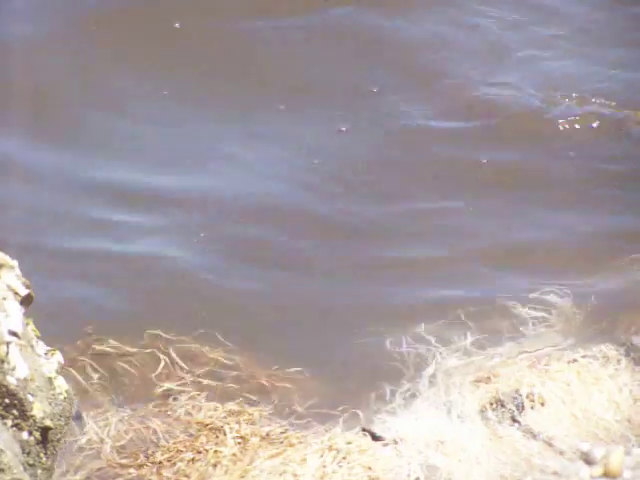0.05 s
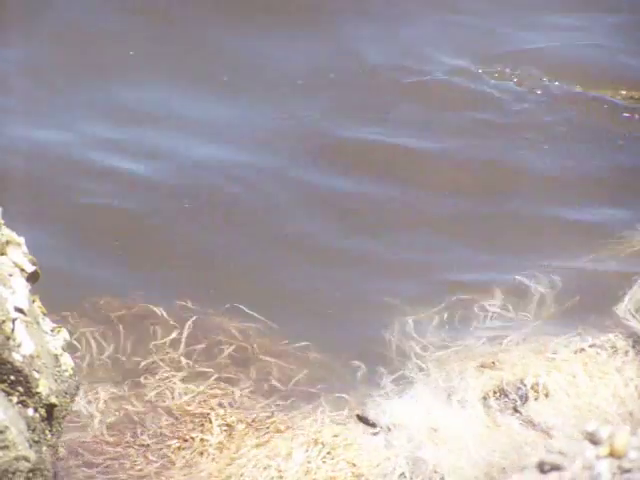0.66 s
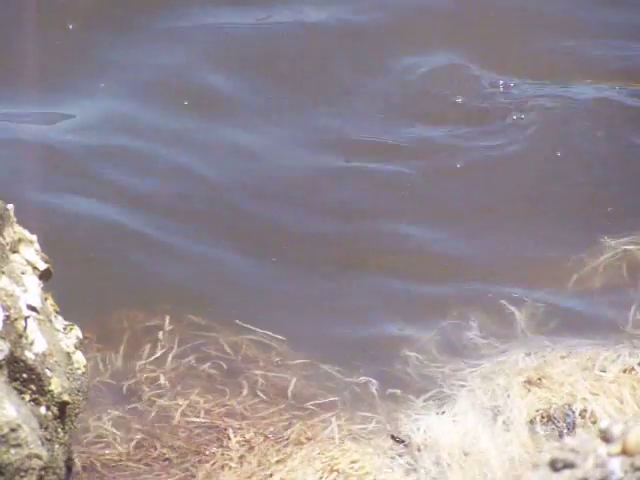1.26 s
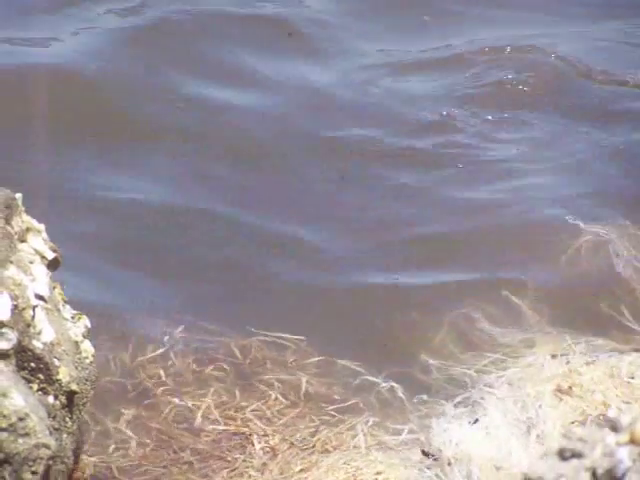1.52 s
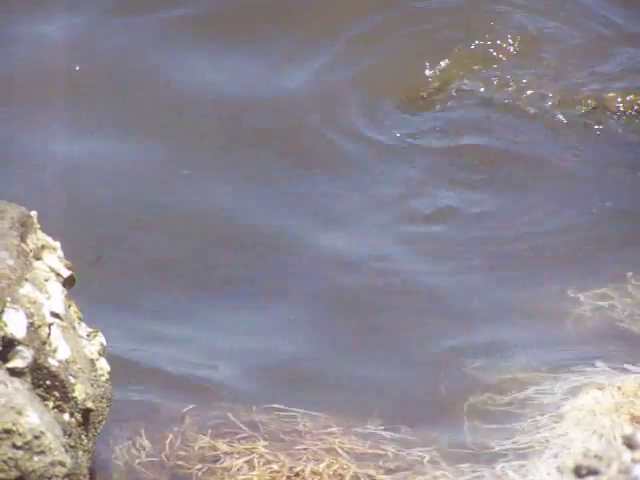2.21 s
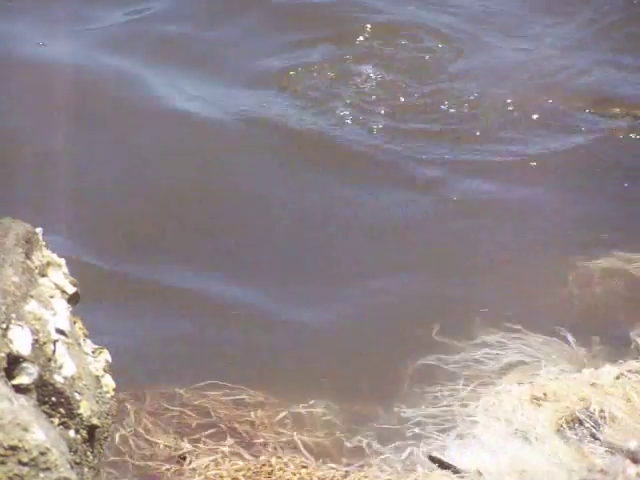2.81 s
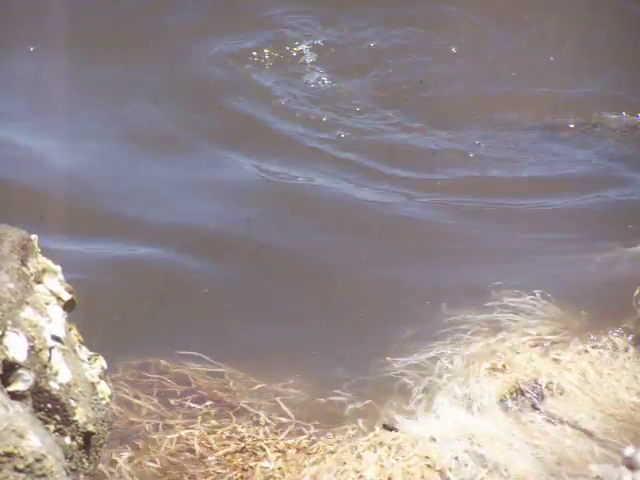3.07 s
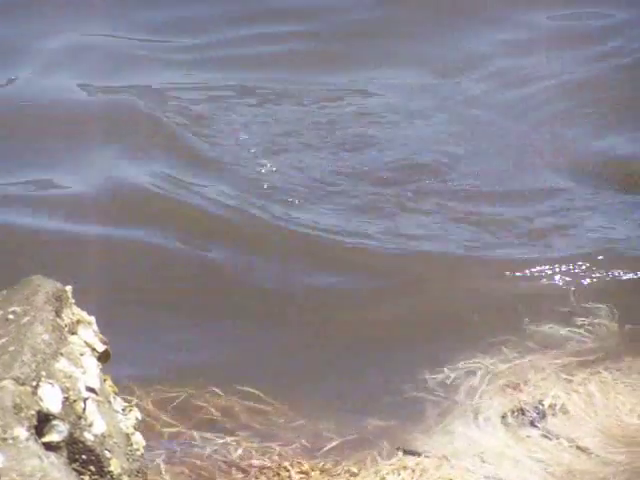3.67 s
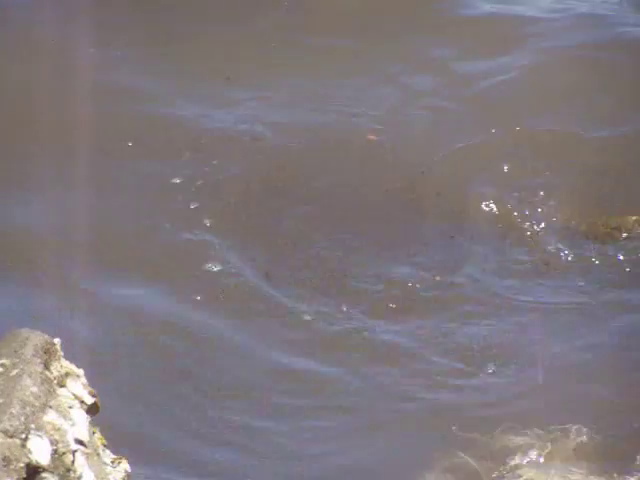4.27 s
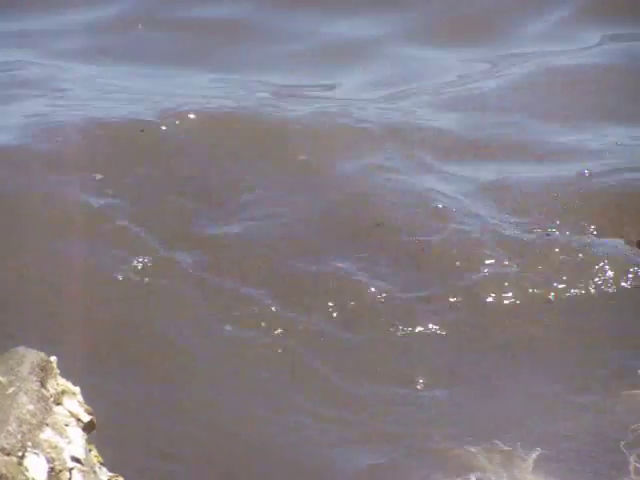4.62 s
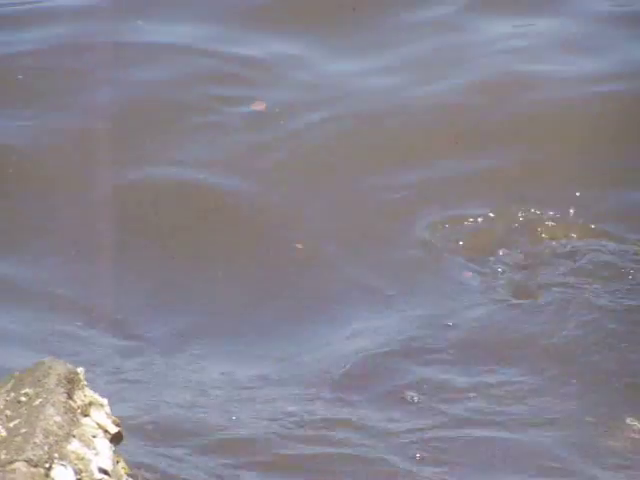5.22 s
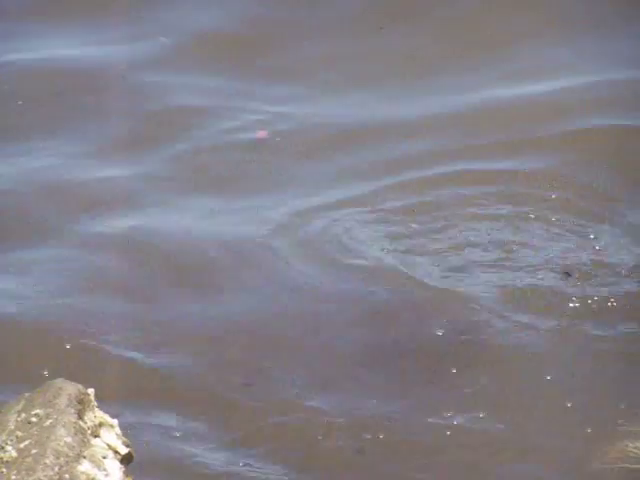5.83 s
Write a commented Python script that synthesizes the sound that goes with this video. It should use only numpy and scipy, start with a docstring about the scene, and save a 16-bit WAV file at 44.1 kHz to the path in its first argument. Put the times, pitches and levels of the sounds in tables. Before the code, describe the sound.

The sound fades in at about 0.3 seconds, close to the water on a rocky, weedy shore. Foam fizzes continuously as countless tiny bubbles burst, with soft gurgling water beneath. A few sharp little pops stand out between 0.7 and 1.3 seconds. Around 1.8 seconds small waves wash in and the hiss swells to its strongest just after 2 seconds, with light slaps, plops and fine spray. It eases, lifts slightly near 2.8 seconds, and a wavelet gives a brief slap at 3 seconds. Gentler fizzing follows, dotted with bubble pops and droplets ticking on rock. From about 5.3 seconds the foam swells again with a low slosh and more plops, lasting until the end near 6 seconds. A steady low rumble and a faint machine hum lie underneath throughout, and the highest treble is softened.

```python
"""Small waves on a rocky shore

Waves lap through weed and leave foam that fizzes as tiny bubbles burst. Larger bubbles plop and
gurgle, wavelets slap between the rocks, and a few drops tick close by. A low rumble with a faint
machine hum lies under it. The microphone fades in at the start and misses the highest treble."""
import sys
import numpy as np
from scipy import signal
from scipy.fft import rfft, irfft
from scipy.io import wavfile

SR = 44100
rng = np.random.default_rng(int(sys.argv[2]) if len(sys.argv) > 2 else 0)


def pcm_store(signal):
    """Save signal as 16-bit PCM."""
    levels = np.round(np.clip(np.atleast_2d(signal), -1, 1) * 32767)
    wavfile.write(sys.argv[1], SR, levels.astype(np.int16).T)


N = 257544
TIME = np.arange(N) / SR
FREQS = np.fft.rfftfreq(N, 1 / SR)
CALM_FOAM_DB = -33  # foam level between waves


def wave_level(part, calm_db, fall_db_per_s):
    """Level in dB of "foam" or "spray": each wave builds to its crest, then dies back into the calm."""
    # small waves washing into the weed: start/s, time to crest/s, foam at crest/dB, spray at crest/dB
    waves = [(0.1, 0.29, -26, -43), (0.7, 0.3, -38.5, -57), (0.97, 0.22, -40, -46),
             (1.75, 0.071, -28.5, -40.5), (1.92, .24, -23.5, -44.5), (2.52, 0.25, -29, -50),
             (2.955, 0.027, -31, -44.5), (3.45, 0.15, -31, -53), (3.74, .17, -32, -45),
             (4.18, 0.17, -32.5, -61), (5.1, 0.12, -35.5, -43), (5.33, 0.14, -26, -39.5),
             (5.58, 0.09, -28.5, -47), (5.76, 0.079, -26.5, -46)]
    power = gain_of(calm_db) ** 2
    for start, rise_s, foam_db, spray_db in waves:
        crest_db = foam_db if part == "foam" else spray_db
        age = TIME - start
        fall_db = fall_db_per_s * np.maximum(age - rise_s, 0)
        power = power + np.clip(age / rise_s, 0, 1) * gain_of(crest_db - fall_db) ** 2
    return 10 * np.log10(power)


def foam(foam_db):
    """Near bubbles burst one by one; the many farther away blend into a smooth hiss."""
    # tone of the fizz: f/Hz, level/dB
    tone = [(600, -37.5), (1250, -5), (1700, -3), (2700, -2.5), (3200, 0.25), (4000, 1.5), (4450, -2.5),
            (5000, -4), (6000, -12), (7200, -20), (9000, -46)]
    bursts = swarm(low_hz=1426, high_hz=7530, per_s=2300, spread_db=4.6, cycles=2.3, rise=0.034)
    flicker_db = drift(hz=36)
    near = coloured(bursts, tone) * gain_of(foam_db - 2.5)
    far = coloured(rng.standard_normal(N), tone) * gain_of(foam_db - 1.5)
    return (near + far) * gain_of(flicker_db)


def churn(foam_db, calm_db=-33.5, follow=0.24):
    """Larger bubbles gurgle in the wash of moving water, swelling a little with the foam."""
    # tone of the churning water: f/Hz, level/dB
    tone = [(120, -10), (200, 2), (300, 4), (420, 3), (520, 1.5), (750, 0), (1100, -0.5), (1350, -4),
            (1750, -3.5), (2400, -6.5), (3500, -15.5), (7000, -47)]
    gurgle = swarm(low_hz=399.5, high_hz=2424, per_s=380, spread_db=1.5, cycles=2.47, rise=0.022, count=36)
    wash = gain_of(10) * rng.standard_normal(N)
    return coloured(gurgle + wash, tone) * gain_of(calm_db + follow * (foam_db - CALM_FOAM_DB))


def swarm(low_hz, high_hz, per_s, spread_db, cycles, rise, count=48):
    """Countless bubbles at `count` pitches, each with a decay time of roughly `cycles` vibrations."""
    out = np.zeros(N)
    for hz in np.geomspace(low_hz, high_hz, count):
        births = random_clicks(per_s / count, spread_db)
        ring = bubble(hz, cycles * rng.uniform(.4, 1.6) / hz, rise)
        out += np.sqrt(hz) * unit_level(signal.oaconvolve(births, ring)[:N])  # one ring per click
    return unit_level(out)


def bubble(hz, decay_s, rise):
    """A pocket of air under the surface swells into a note and dies; its pitch climbs as it rises."""
    age = np.arange(int(12 * decay_s * SR) + 8) / (decay_s * SR)  # counted in decay times
    loudness = age ** 2 * np.exp(-age)
    pitch = hz * (1 + rise * (age - 2))
    return loudness / loudness.max() * np.sin(2 * np.pi * np.cumsum(pitch) / SR)


def pop(hz, decay_s):
    """A bubble's skin snaps: a sudden, tiny ping. So small a source gives off no bass."""
    age = np.arange(int(9 * decay_s * SR) + 8) / (decay_s * SR)  # counted in decay times
    loudness = (1 - np.exp(-(1.6 * age) ** 2)) * np.exp(-age)
    swing = loudness * np.sin(2 * np.pi * hz * decay_s * age)
    pressure = np.gradient(np.gradient(swing))  # taking the slope twice removes the bass
    return pressure / abs(pressure).max()


def close_drops_and_bubbles():
    """Single ticks, pops and plops, each with a short echo off the rocks and the water."""
    # droplets flicked onto the rock: t/s, level/dB
    ticks = [(1.2275, -21), (1.439, -27), (2.1745, -20), (2.7473, -16.5), (3.46, -17.5), (3.8089, -15),
             (3.8465, -18), (3.9644, -24), (4.0664, -21), (4.165, -23), (4.9242, -20), (5.2665, -20),
             (5.4015, -20), (5.6617, -12.5)]
    # bubble skins snapping: t/s, f/Hz, level/dB, decay time/s
    pops = [(.3526, 3970, -2.5, 0.00033), (.6706, 3900, -2, .00037), (.8359, 3520, -11, 0.00072),
            (.9486, 4020, -7, .00057), (1.1672, 4170, -5.5, 0.00051), (1.2266, 2800, -8, 0.00029),
            (1.2593, 3500, -13.5, 0.00053), (2.065, 3750, -13, .00064), (3.2, 3670, -11, 0.00064),
            (3.2855, 3880, -12, 0.00045), (3.9226, 4920, -8, 0.00053), (4.51, 5150, -13, 0.00029),
            (4.7378, 4170, -12, 0.00032), (4.8325, 3000, -11, .00033), (4.961, 4900, -16, 0.00034),
            (5.062, 5130, -15, .0003), (5.098, 5300, -16, 0.00027), (5.1702, 3800, -21, 0.00045),
            (5.189, 4130, -10, 0.0002), (5.3006, 4500, -12.5, .0004), (5.4048, 3200, -10, 0.0002),
            (5.6501, 3730, -9, .00036)]
    # trapped air ringing in the water: t/s, f/Hz, level/dB
    plops = [(1.7459, 3180, -17), (1.963, 3350, -17.5), (2.0594, 522, -14.5), (2.138, 3700, -16),
             (2.199, 1670, -19), (2.2669, 2330, -15), (2.9543, 930, -17.5), (2.965, 1960, -20),
             (3.0486, 1510, -22), (3.096, 1395, -26), (3.1943, 1660, -17), (3.5023, 3100, -15.5),
             (3.581, 2270, -21), (3.6257, 3100, -14), (3.8028, 690, -27), (3.9181, 530, -26.5),
             (4.0599, 3800, -14), (4.4052, 4000, -15), (4.4455, 1140, -24.5), (4.5814, 1430, -26),
             (5.3145, 1670, -21), (5.3382, 980, -24), (5.404, 2550, -14.5), (5.4279, 410, -24),
             (5.554, 700, -22.5), (5.5708, 460, -22.5), (5.7248, 2010, -18.5), (5.7297, 498, -23.5),
             (5.8056, 910, -23)]
    out = np.zeros(N)
    for start, db in ticks:
        add(out, start, gain_of(db) * pop(hz=5900, decay_s=0.00043))
    for start, hz, db, decay_s in pops:
        add(out, start, gain_of(db) * pop(hz, decay_s))
    for start, hz, db in plops:
        decay_s = 0.0016 * (1000 / hz) ** 0.76  # large, low bubbles ring longer
        add(out, start, gain_of(db) * bubble(hz, decay_s, rise=0.0052))
    t = TIME[:2048]
    echo = rng.standard_normal(len(t)) * np.exp(-t / .007) * (t > .001)
    out += gain_of(-9) * signal.oaconvolve(out, echo / np.linalg.norm(echo))[:N]
    # the small microphone takes the edge off the snaps
    return signal.sosfilt(signal.butter(4, 6500, fs=SR, output="sos"), out)


def slaps():
    """A wavelet folds over: a quick burst of spatter that dies away."""
    # wavelets sloshing between the rocks: t/s, length/s, level/dB, centre f/Hz, width/octaves
    wavelets = [(1.818, 0.12, -28, 3720, 0.49), (1.943, 0.047, -25, 3300, 0.27),
                (2.048, 0.044, -26.5, 262, 0.23), (2.088, 0.11, -36, 520, 0.36),
                (2.265, 0.044, -27.5, 2300, 0.38), (2.952, 0.031, -20.5, 1820, 1),
                (3.033, .018, -23.5, 3900, .4), (3.618, .022, -27, 3700, .35),
                (3.8, 0.027, -26, 1500, 0.86), (3.91, .025, -30, 5300, 0.3), (4.057, 0.011, -28, 3920, .3),
                (4.338, .04, -34.5, 1290, 0.4), (4.431, 0.04, -30, 1200, 0.92),
                (4.576, .03, -30.5, 1200, 0.55), (4.831, 0.0041, -21, 2500, .8),
                (5.166, 0.024, -22.5, 4600, 0.53), (5.38, 0.42, -35.5, 413, 0.27),
                (5.641, 0.027, -26, 5500, 0.46)]
    out = np.zeros(N)
    for start, length, db, centre_hz, octaves in wavelets:
        band = np.exp(-.5 * (np.log2((FREQS + 1) / centre_hz) / octaves) ** 2)
        band /= 1 + (FREQS / 5500) ** 6  # softens the treble
        spatter = unit_level(irfft(rfft(rng.standard_normal(N)) * band, N))
        age = np.maximum(TIME - start, 0)
        loudness = (1 - np.exp(-age / 0.00066)) * np.exp(-(age / length) ** 2)
        out += gain_of(db) * spatter * loudness
    return out


def spray():
    """The finest droplets fall back after each wave as sharp ticks, in clumps, with a misty hiss."""
    # tone of the spray: f/Hz, level/dB
    tone = [(3500, -23), (5200, 8), (6400, 5), (7400, 0.5), (8000, -10), (8600, -19), (9200, -38)]
    ticks = unit_level(random_clicks(per_s=130, spread_db=4))
    mist = gain_of(-6) * rng.standard_normal(N)
    clump_db = 3 * drift(hz=50)
    spray_db = wave_level("spray", calm_db=-52, fall_db_per_s=30)
    return coloured(ticks + mist, tone) * gain_of(spray_db + clump_db)


def rumble(level_db=-35, swell_db=0.5):
    """A low rumble that slowly swells and sinks a little."""
    # tone of the rumble: f/Hz, level/dB
    tone = [(8, -36), (27, -9), (50, -7), (60, -1.5), (76, 0.5), (92, -1), (115, -1), (145, -1),
            (165, -6.5), (190, -3.5), (250, -11), (700, -68)]
    return coloured(rng.standard_normal(N), tone) * gain_of(level_db + swell_db * drift(hz=1.8))


def machine_hum():
    """A machine hums faintly on several slightly wavering notes."""
    # notes of the hum: f/Hz, average level/dB
    notes = [(59.2, -41), (74, -42.5), (91, -42.5), (144.5, -49), (226, -50.5), (405, -49.5), (521, -48.5),
             (1018, -54), (1100, -51), (4701, -48.5), (4938, -53)]
    out = np.zeros(N)
    for hz, db in notes:
        phase = 2 * np.pi * (hz * TIME + rng.random())
        waver = 0.86 * drift(hz=4.2)
        out += gain_of(db) * np.sqrt(2) * np.sin(phase + waver)
    return out


def random_clicks(per_s, spread_db):
    """Clicks at chance moments: most are faint, a few stand out."""
    size = gain_of(spread_db * np.minimum(rng.exponential(1, N), 3.5))
    return size * rng.choice([-1., 1.], N) * (rng.random(N) < per_s / SR)


def drift(hz):
    """A smooth random wobble of size about 1, with little in it faster than hz."""
    return unit_level(irfft(rfft(rng.standard_normal(N)) / (1 + (FREQS / hz) ** 4), N))


def coloured(x, tone):
    """Shapes the bass and treble of x by rows of f/Hz, level/dB, then scales it to level 1."""
    hz, db = np.transpose(tone)
    curve_db = np.interp(np.log(FREQS + 1), np.log(hz), db)
    return unit_level(irfft(rfft(x) * gain_of(curve_db), N))


def unit_level(x):
    """Scales x to an average (rms) level of 1."""
    return x / np.sqrt(np.mean(x ** 2) + 1e-20)


def gain_of(db):
    """Turns decibels into a number to multiply by."""
    return 10 ** (np.asarray(db) / 20)


def add(mix, start_s, sound):
    """Adds a sound to the mix at the given time."""
    part = mix[max(round(start_s * SR), 0):][:len(sound)]
    part += sound[:len(part)]


def scene():
    """The waves drive the fizz, churning and spray; splashes, rumble and hum join them."""
    foam_db = wave_level("foam", calm_db=CALM_FOAM_DB, fall_db_per_s=24.5)
    water = foam(foam_db) + churn(foam_db) + spray() + slaps() + close_drops_and_bubbles()
    return (water + rumble() + machine_hum())[None]


def record(dry, on_s=0.302, fade_s=0.45, fade_from_db=-27, top_hz=8960):
    """The microphone switches on, fades up and loses the treble above top_hz."""
    fade_db = fade_from_db * np.clip(1 - (TIME - on_s) / fade_s, 0, 1)
    faded = dry * gain_of(fade_db) * (TIME > on_s)
    treble_cut = signal.firwin(401, top_hz, window=("kaiser", 9), fs=SR)
    return signal.oaconvolve(faded, treble_cut[None], "same")


dry = scene()
out = record(dry)
pcm_store(out)
```